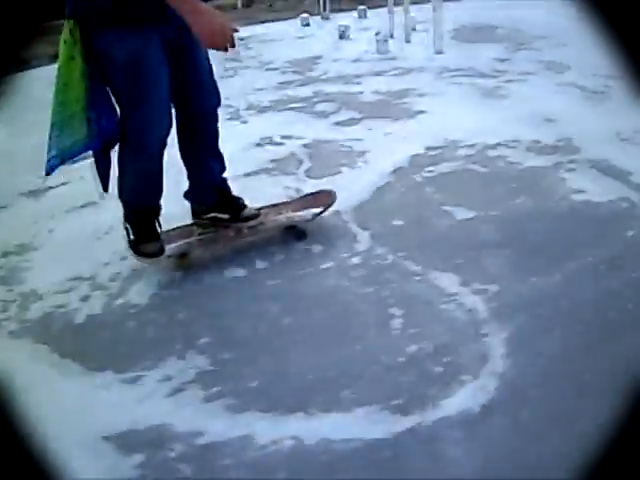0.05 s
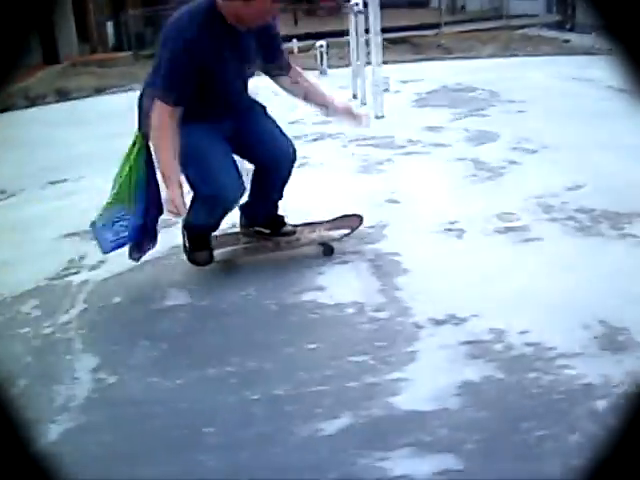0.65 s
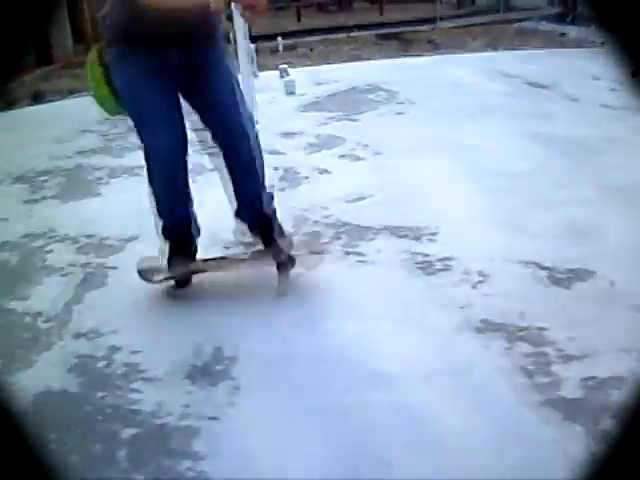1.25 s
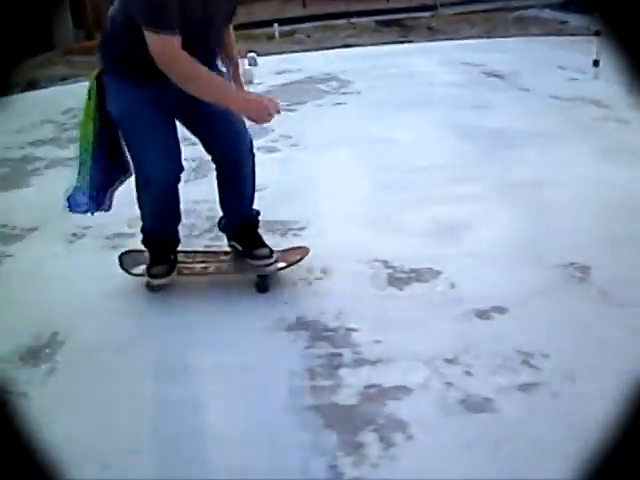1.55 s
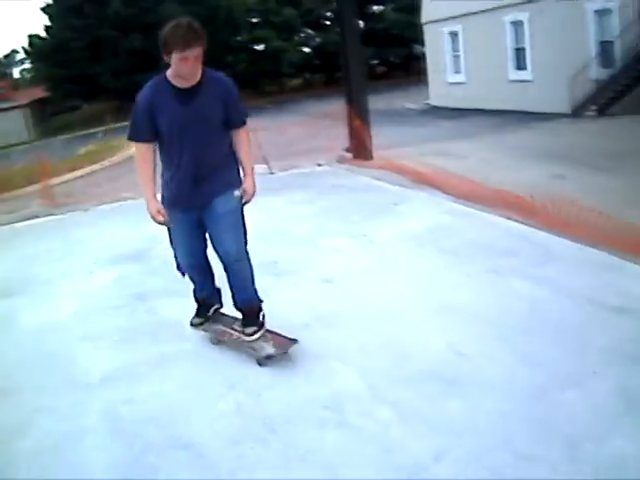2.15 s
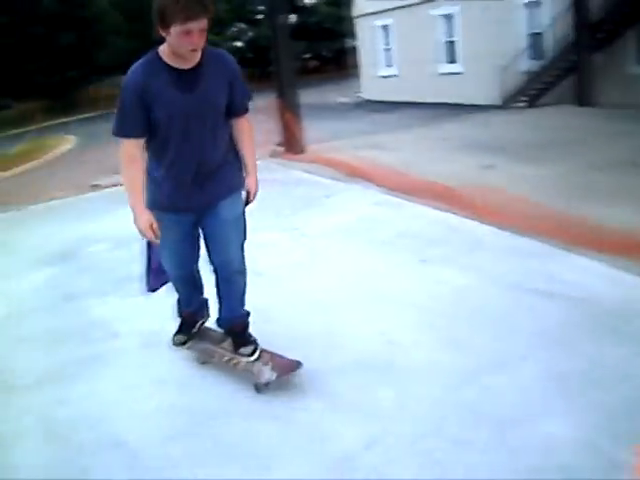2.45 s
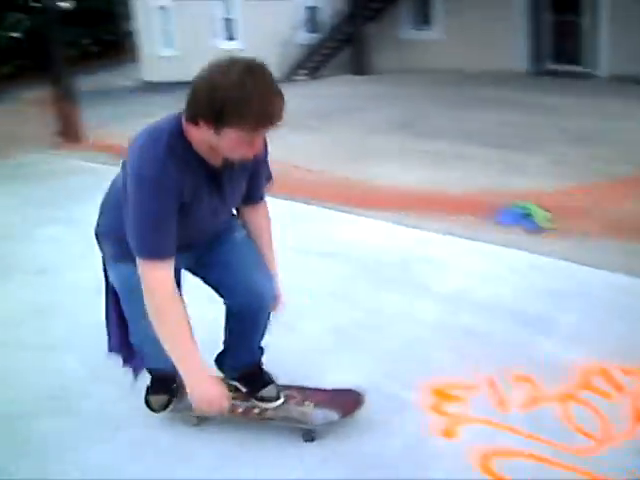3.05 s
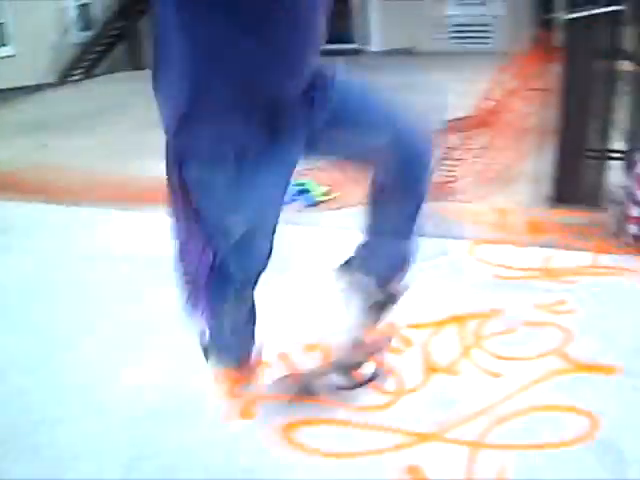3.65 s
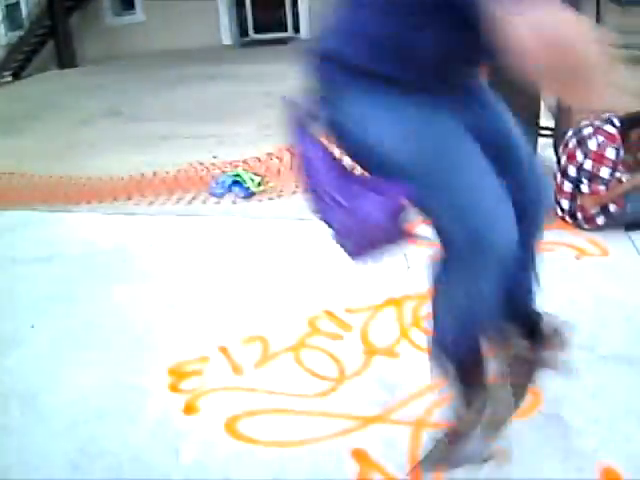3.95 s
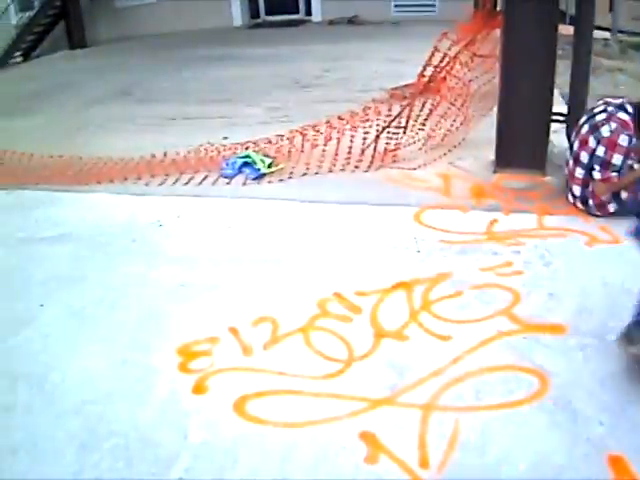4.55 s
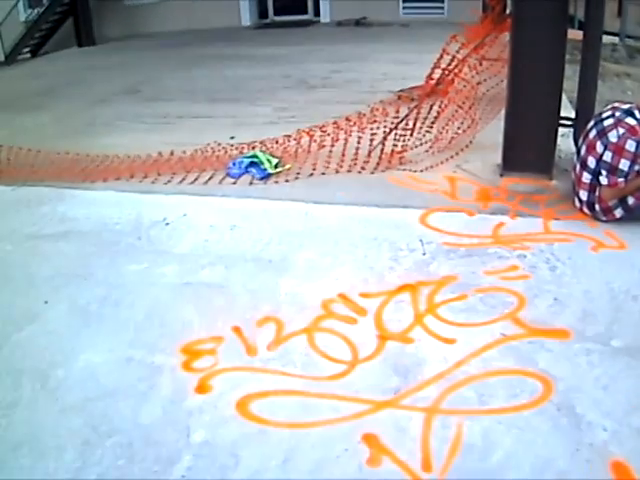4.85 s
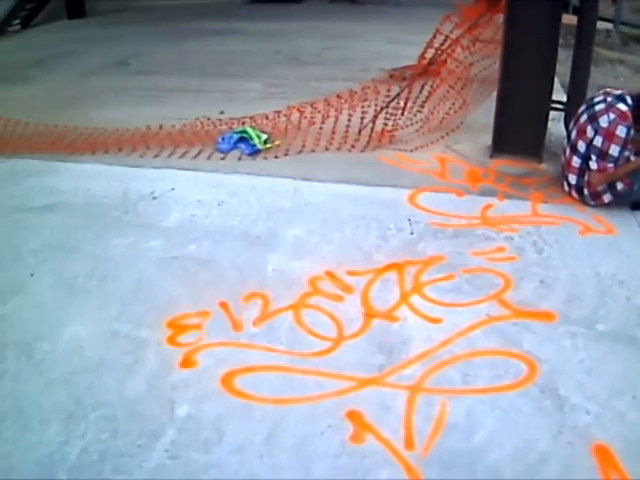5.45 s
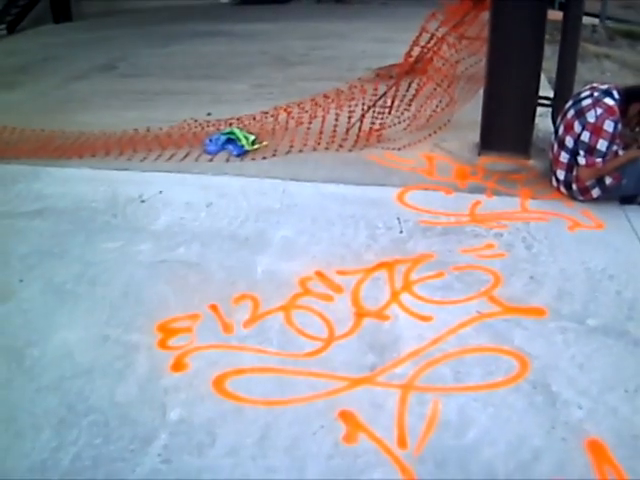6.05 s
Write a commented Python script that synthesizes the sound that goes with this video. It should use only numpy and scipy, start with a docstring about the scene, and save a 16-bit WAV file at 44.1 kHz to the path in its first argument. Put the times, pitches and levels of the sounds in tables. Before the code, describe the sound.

Hard skateboard wheels grind along rough concrete through two runs, each with a sharp tail snap, scraping soles and a clattering wooden landing with a tiny squeak. The second run passes close by, knocks once more and fades into the distance. Plastic clicks, a creak and finger rubs sound right beside the muffled, slightly distorting camera microphone, with steady open-air rumble and hiss underneath.

```python
"""A skateboard rolls over gritty concrete, heard from a hand-held camera that clicks and rubs in the hand.
At 0.9 s the tail pops for a flip trick, shoes scuff the grip tape, and at 1.2 s the deck slams down.
This run breaks off at 2 s. In a second run the skater comes closer, pops at 3.6 s, flips with whirring
wheels, lands close by at 4 s with a chirp of urethane and rolls away until the sound stops at 6.2 s.
Every hard blow overloads the camera's dull microphone."""
import sys
import numpy as np
from scipy import signal
from scipy.fft import rfft, irfft, next_fast_len
from scipy.io import wavfile
from scipy.ndimage import uniform_filter1d, map_coordinates

SR = 44100
rng = np.random.default_rng(int(sys.argv[2]) if len(sys.argv) > 2 else 0)


def int16_out(signal):
    """Quantize to a 16-bit WAV file."""
    q = np.round(np.clip(np.atleast_2d(signal).T, -1, 1) * 32767)
    wavfile.write(sys.argv[1], SR, q.astype(np.int16))


N = 278168
TIME = np.arange(N) / SR
SECOND_RUN_S, END_S = 1.981, 6.213
TAKEOFF_S, TOUCHDOWN_S = 3.58, 3.974  # the second flip

# open-air bed: (frequency [Hz], level [dB])
AIR_EQ = [(30, -26), (70, -4.5), (140, -3.5), (300, -3.5), (1000, -2.5), (5000, -20.5)]
# the microphone's dull top end: (frequency [Hz], gain [dB])
MIC_EQ = [(3000, 0), (4000, -4), (5200, -8), (6000, -20), (7000, -38), (7600, -55), (10500, -49),
          (11500, -60)]
# clicks of the camera's casing: (time [s], level [dB], ring [Hz], relative low push [dB])
CASING_CLICKS = [(0.5846, 0.5, 1880, -34), (1.3496, 1, 2170, -40), (1.714, -3.5, 3900, -35),
                 (2.2747, -0.5, 2424, -22), (2.863, -14.5, 2600, -10), (3.1471, -4.5, 2320, -23),
                 (3.4166, 0.5, 2240, -17.5), (4.1981, 5.5, 2535, -8), (4.366, 5.5, 2450, 0),
                 (4.451, 7, 2340, 4), (4.679, -6.5, 2620, -25), (4.6867, 5, 2440, 10),
                 (4.6946, 5, 2430, -1), (4.709, 9.5, 2420, 6), (5.331, -10.5, 2540, -13),
                 (5.6257, -17.5, 1080, -15), (5.6282, -12.5, 3200, -24), (5.65, -12.5, 3490, -13),
                 (5.679, -28.5, 1980, -15), (6.11, -11, 2530, -18)]
# skin on the casing: (frequency [Hz], level [dB])
FINGER_EQ = [(40, -35), (300, -16.5), (800, -4.5), (1200, -10), (2000, -8), (3000, -0.5), (4000, -12),
             (5000, -7), (7000, -42)]
# finger strokes on the camera: (peak time [s], level [dB], ring [Hz], swell time [s])
FINGER_STROKES = [(5.797, -27, 3160, 0.0062), (5.845, -26, 3230, 0.025), (6.13, -31.5, 2670, 0.054),
                  (6.192, -23, 2725, 0.031)]
# soles on grip tape: (frequency [Hz], level [dB])
GRIP_EQ = [(60, -36), (300, -17.5), (1200, -8.5), (2500, 2.5), (3100, 0.5), (3700, -2), (4600, -7),
           (7000, -19)]
# shoes flicking, catching and settling, and at 1.7 s a long ringing ping of the camera's casing: (peak time
# [s], level [dB], ring [Hz], swell time [s])
SHOE_STROKES = [(0.882, -22.5, 3240, 0.011), (1.385, -23, 2870, 0.034), (1.716, -21, 3920, 0.006),
                (3.569, -20.5, 2520, 0.014), (3.592, -25, 2600, 0.028), (3.682, -25.5, 1876, 0.028),
                (3.76, -33.5, 2700, 0.07), (3.772, -24.5, 2320, 0.0082), (3.836, -21.5, 2620, 0.024),
                (3.88, -30, 3760, 0.01), (3.925, -23.5, 2600, 0.019), (4.055, -20, 2670, 0.03)]
# passing tones of wheels and trucks: (peak time [s], level [dB], pitch [Hz], swell and fade time [s])
TRUCK_TONES = [(2.613, -35, 2850, 0.055), (2.821, -29, 810, 0.039), (3.032, -28, 1240, 0.06),
               (3.268, -37.5, 690, 0.046), (3.33, -31.5, 1800, 0.11), (3.703, -21, 1090, 0.02),
               (4.01, -14, 400, 0.02), (4.14, -24.5, 430, 0.035), (4.16, -24, 1124, 0.017),
               (4.641, -21, 350, 0.013), (4.642, -20.5, 684, 0.01)]
# tones of the board in the air, bearings whirring and the deck ringing at 626 Hz: (pitch [Hz], wander scale
# [Hz], level [dB])
AIRBORNE_TONES = [(626, 15, 0), (968, 58, 1.5), (1140, 67, 4.5), (1296, 48, -6.5), (1840, 35, -11),
                  (2600, 60, -6), (3170, 100, -10.5)]
# the roll when followed, coming closer and going away: (frequency [Hz], level [dB])
FOLLOW_EQ = [(40, -28.5), (120, -24), (200, -13.5), (380, -14.5), (510, -9), (600, 0), (760, 0), (880, -7),
             (1350, -7.5), (1650, -12.5), (2500, -16.5), (3200, -13.5), (3900, -27), (4900, -26),
             (7000, -31)]
TOWARD_EQ = [(40, -36), (140, -24), (420, -14), (700, -1), (850, -2), (950, -4), (1250, 1.5), (1600, -9),
             (2000, -10), (2900, -11), (4000, -20.5), (5100, -24.5), (7000, -20.5)]
AWAY_EQ = [(40, -24.5), (200, -24), (300, -5), (480, -8), (620, 2.5), (850, 4.5), (1100, -5), (1500, 1),
           (2100, -1.5), (2550, 3), (3100, 2.5), (3900, -17.5), (4400, -14.5), (5100, -9), (7000, -24.5)]
# the departing roll sinks unevenly as the board slows: (time [s], gain [dB])
SLOWING_FADER = [(4.75, 1), (5.2, 2.5), (5.43, 2.5), (5.57, -5.5), (5.7, -1.5), (5.77, -3.5), (5.82, -1),
                 (5.95, -2.5), (6.05, -9.5)]
# urethane skids: (peak time [s], level [dB], pitch at the peak [Hz], fade time [s], sag [octaves/s])
SKID_CHIRPS = [(1.41, -7, 980, 0.004, 11), (4.077, -7, 1228, 0.0043, 6), (4.62, -5.5, 926, 0.009, 4)]
# modes of the tail: (pitch [Hz], level [dB], t60 [s])
TAIL_MODES = [(356, -17, 0.16), (473, -1.5, 0.045), (611, -2.5, 0.13), (1261, 0, 0.04), (1930, -3.5, 0.018),
              (2450, -10.5, 0.055)]
# modes of the maple deck and its trucks: (pitch [Hz], width [Hz], level [dB])
DECK_MODES = [(70, 33, -21.5), (196, 50, -18.5), (259, 53, -10.5), (352, 49, -11.5), (453.3, 66, -5),
              (541.3, 41, -1), (597.8, 41, 0.5), (712.5, 67, -0.5), (860, 160, -4), (1040, 160, -7),
              (1187, 59, -4), (1365, 180, -7.5), (1785, 82, -10.5), (2460, 170, -17.5)]
# the bright crack on top of a blow: (frequency [Hz], level [dB])
CRACK_EQ = [(100, -29), (700, -4), (1400, 1.5), (2600, -1), (3600, -3), (5000, -28), (7000, -11.5)]
# the tail slap that starts each flip: (time [s], level [dB], relative crack [dB], chatter hold [s],
# t60 [s], low push [dB], tail ring [dB], tail sustain [factor])
TAIL_POPS = [(0.8668, -6.5, 2.5, 0.0045, 0.025, -17, -9, 0.7), (3.578, -4, 1, 0.0023, 0.05, -32, -7, 1.42)]
# catches, bounces and bumps:
# (time [s], level [dB], relative crack [dB], relative ring [dB], hardness [dB/octave], t60 [s])
DECK_KNOCKS = [(0.8829, -12.5, -4, -16, 5, 0.044), (0.9105, -15, -15, -15, -1.5, 0.023),
               (0.9585, -10, -11, -14.5, -0.5, 0.018), (3.208, -28.5, -24, -16, -8, 0.04),
               (3.9298, -1, 2.5, -16.5, -6.5, 0.027), (3.943, -16.5, -12.5, -11.5, -4, 0.13),
               (4.027, -7, -15, -13, -2, 0.025), (4.0603, -8.5, 0.5, -18.5, 3.5, 0.04),
               (4.0745, -7, -12.5, -18, 0, 0.083), (4.102, -11.5, -10.5, -15, 4.5, 0.068),
               (4.142, -16.5, -13.5, -14.5, -2, 0.04), (4.172, -17.5, -4, -15, 6, 0.06),
               (4.719, -2.5, -5.5, -13, 0.5, 0.043), (4.892, -12.5, -3, -21.5, -4.5, 0.019),
               (5.178, -28, -20, -15, -4, 0.04)]
# landings under the rider's weight: (time [s], level [dB], chatter hold [s], t60 [s], hardness [dB/octave])
DECK_SLAMS = [(1.209, 4, 0.005, 0.018, 0.5), (1.231, 2.5, 0.0068, 0.036, -2), (1.254, 0, 0.028, 0.044, -2),
              (3.9742, 2.5, 0.012, 0.072, -1), (3.988, 1, 0.014, 0.1, 0.5)]
# the trucks rebound and chatter after a landing: (peak time [s], level [dB])
TRUCK_REBOUNDS = [(1.394, -15.5), (4.07, -15)]


def amp(db):
    """Decibels to gain."""
    return 10 ** (np.asarray(db) / 20)


def unit(x):
    """Scale to rms 1."""
    return x / np.sqrt(np.mean(x ** 2) + 1e-20)


def eq(points):
    """EQ curve: gain against frequency, through (frequency [Hz], level [dB]) points on a log axis."""
    f, db = np.transpose(points)
    return lambda hz: amp(np.interp(np.log(hz + 1), np.log(f + 1), db))


def filtered(x, response):
    """Run x through an EQ curve."""
    size = next_fast_len(N + 8192)
    return irfft(rfft(x, size) * response(np.fft.rfftfreq(size, 1 / SR)), size)[:N]


def wobble(rate):
    """Smooth random modulation, rate knots a second."""
    coarse = TIME[::16]
    knots = rng.standard_normal(int(N * rate / SR) + 4)
    return np.interp(TIME, coarse, map_coordinates(knots, [coarse * rate]))


def ramp(start, length):
    """Linear fade from 0 to 1 over length seconds."""
    return np.clip((TIME - start) / length, 0, 1)


def swell(s, rise, fall):
    """Envelope that swells to its peak at time s and dies away."""
    gain = np.zeros(N)
    near = (TIME > s - 10 * rise) & (TIME < s + 20 * fall)
    t = TIME[near] - s
    gain[near] = np.exp(-np.where(t < 0, (t / rise) ** 2, t / fall))
    return gain


def add(track, s, sound):
    """Mix a sound into the track at time s."""
    part = track[round(s * SR):]
    part[:len(sound)] += sound[:len(part)]


def grains(rate):
    """Scattered ticks, on average rate a second."""
    return rng.standard_normal(N) * (rng.random(N) < rate / SR)


def patchy(x, depth_db):
    """Passing resonances: patches a few hundred Hz wide swell and fade."""
    spectra = signal.stft(x, nperseg=512)[2]
    patches = uniform_filter1d(rng.standard_normal(spectra.shape), size=4, axis=0)
    patches = uniform_filter1d(patches, size=16, axis=1)
    return signal.istft(spectra * amp(depth_db * unit(patches)), nperseg=512)[1][:N]


def friction(spectrum, grit_rate, grit_db, flutter_db, patchy_db):
    """Rough surfaces in contact: a fine rush and single grains shake one body; rms 1."""
    grit = amp(grit_db) * unit(grains(grit_rate))
    force = (rng.standard_normal(N) + grit) * amp(flutter_db * wobble(55))
    return unit(filtered(patchy(force, patchy_db), eq(spectrum)))


def rasp(strokes, rush, slip_rate, ring_db, width_hz):
    """Rubbing strokes: a gritty rush, and tiny slips that ring one resonance per stroke."""
    out = np.zeros(N)
    slips = grains(slip_rate)
    for s, db, hz, rise in strokes:
        ring = unit(signal.lfilter(*signal.iirpeak(hz, hz / width_hz, fs=SR), slips))
        out += amp(db) * swell(s, rise, fall=1.6 * rise) * (rush + amp(ring_db) * ring)
    return out


def open_air():
    """A steady bed of low rumble and hiss."""
    return amp(-43) * unit(filtered(rng.standard_normal(N), eq(AIR_EQ)))


def wall_reverb(x, t60):
    """Diffuse answer of the surrounding walls."""
    t = np.arange(SR // 2) / SR
    tail = rng.standard_normal(len(t)) * amp(-60 * t / t60) * (1 - np.exp(-t / 0.0049))
    return signal.fftconvolve(x, tail / np.linalg.norm(tail))[:N]


def casing_creak(start_s=4.6153, count=9, gap_s=0.0034, db=-0.5, hz=2060, rise_hz_per_s=16000):
    """The casing creaks in a quick rising run of slips, given as rows like CASING_CLICKS."""
    delays = gap_s * (np.arange(count) + rng.uniform(0, 0.24, count))
    return [(start_s + delay, db, hz + rise_hz_per_s * delay, -23) for delay in delays]


def casing_clicks(t60_cycles=34.4, body_t60=0.02, snap_t60=0.012):
    """Plastic snaps beside the microphone; hard snaps also knock the housing and push the membrane."""
    out = np.zeros(N)
    t = np.arange(SR // 20) / SR
    treble = signal.butter(4, 4700, "high", fs=SR, output="sos")
    housing = signal.butter(2, [450, 1500], "band", fs=SR, output="sos")
    noise = lambda band: signal.sosfilt(band, rng.standard_normal(len(t)))
    for s, db, hz, push_db in CASING_CLICKS + casing_creak():
        ring_band = signal.butter(3, [0.74 * hz, 1.16 * hz], "band", fs=SR, output="sos")
        ring = np.sin(2 * np.pi * hz * t) + amp(-6.5) * np.sin(2 * np.pi * 0.774 * hz * t)
        rattle = amp(-4) * unit(noise(ring_band))
        envelope = amp(-60 * t * hz / t60_cycles) * (1 - np.exp(-t / 0.00049))
        push = amp(push_db + 2) * np.exp(-((t - 0.0012) / 0.00014) ** 2)
        body = amp(-12 + min(push_db, 0) - 60 * t / body_t60) * unit(noise(housing))
        snap = amp(-5 - 60 * t / snap_t60) * noise(treble)
        add(out, s, amp(db) * ((ring + rattle) * envelope + body + snap - push))
    return out


def finger_rubs():
    """Fingers drag and slip on the camera's casing."""
    skin = friction(FINGER_EQ, grit_rate=1500, grit_db=0, flutter_db=2.5, patchy_db=2.5)
    return rasp(FINGER_STROKES, skin, slip_rate=950, ring_db=-2, width_hz=160)


def shoe_scuffs():
    """Soles scrape over the coarse grip tape; the same gritty rasp also carries the casing's long ping at 1.7
    s."""
    grip = friction(GRIP_EQ, grit_rate=380, grit_db=-2, flutter_db=2.5, patchy_db=2)
    return rasp(SHOE_STROKES, grip, slip_rate=700, ring_db=-4, width_hz=130)


def singing_trucks(width_hz=170):
    """Resonances of wheels and trucks come and go as the load shifts, each a narrow rough band."""
    out = np.zeros(N)
    flutter = unit(wobble(2 * width_hz)) + 1j * unit(wobble(2 * width_hz))
    drift = np.angle(flutter)
    for s, db, hz, length in TRUCK_TONES:
        near = np.abs(TIME - s) < 10 * length
        tone = np.sin(2 * np.pi * hz * TIME[near] + drift[near])
        out[near] += amp(db) * swell(s, length, length)[near] * tone
    return out * np.abs(flutter)


def airborne(attack_s=0.061, release_s=0.067):
    """Soft gate, open while the board is in the air on the second flip."""
    return ramp(TAKEOFF_S, attack_s) * (1 - ramp(TOUCHDOWN_S - release_s, release_s))


def airborne_board():
    """During the second flip the unloaded bearings whirr and the deck rings at 626 Hz, in narrow, wandering
    bands."""
    whirr = np.zeros(N)
    for hz, wander_hz, db in AIRBORNE_TONES:
        pitch = hz + wander_hz * (0.77 * wobble(25) + 1.5 * wobble(400))
        gain = amp(db + 4.4 * wobble(22.286) + 3.8 * wobble(200))
        whirr += gain * np.sin(2 * np.pi * np.cumsum(pitch) / SR)
    return amp(-25.5) * airborne() * unit(whirr)


def first_roll(fade_db_per_s=0.96):
    """Hard wheels on gritty concrete, followed by the camera as the board slowly loses speed."""
    roll = friction(FOLLOW_EQ, grit_rate=900, grit_db=-6.5, flutter_db=0.8, patchy_db=1.5)
    return amp(-19 - fade_db_per_s * TIME) * roll


def second_roll(pass_s=3.846, nearest_m=1.02, speed_m_per_s=1.696):
    """Wheels on concrete in a pass-by: louder as they near, thinner once heard from behind."""
    toward = friction(TOWARD_EQ, grit_rate=1200, grit_db=-8.5, flutter_db=0.93, patchy_db=1)
    away = friction(AWAY_EQ, grit_rate=690, grit_db=-5.5, flutter_db=0.6, patchy_db=2.3)
    distance = np.hypot(nearest_m, speed_m_per_s * (TIME - pass_s))
    # the roll ducks during the flip, then surges as the rider's weight presses the wheels down
    pressed = (TIME > TOUCHDOWN_S) * np.exp(-np.abs(TIME - TOUCHDOWN_S) / 0.11)
    gain = amp(-22 + 8.5 * pressed - 3 * airborne()) * nearest_m / distance
    behind = 0.93 * ramp(start=4.12, length=0.73)
    slowing = amp(np.interp(TIME, *np.transpose(SLOWING_FADER)))
    crossfade = np.sqrt(1 - behind) * toward + np.sqrt(behind) * slowing * away
    distant = amp(-32.5 - 14 * (TIME - SECOND_RUN_S)) * away  # the run opens on a thin, fading roll
    return gain * crossfade + distant


def wheel_chirps():
    """A wheel skids sideways and squeals briefly; its pitch sags as it finds grip."""
    out = np.zeros(N)
    for s, db, hz, fall, sag in SKID_CHIRPS:
        octaves = np.clip(sag * (s - TIME), -1, 1) + 0.046 * wobble(350)
        squeal = np.sin(2 * np.pi * np.cumsum(hz * 2 ** octaves) / SR)
        out += amp(db) * swell(s, rise=0.0036, fall=fall) * squeal
    return out


def tail_ring():
    """The tail rings after it hits the concrete, longer when the foot comes off early."""
    out = np.zeros(N)
    t = np.arange(SR // 3) / SR
    for s, *_, ring_db, sustain in TAIL_POPS:
        for hz, mode_db, t60 in TAIL_MODES:
            add(out, s, amp(ring_db + mode_db - 60 * t / (t60 * sustain)) * np.sin(2 * np.pi * hz * t))
    return out


def chatter(size, hardness_db):
    """Deck and trucks shaken at random, rms 1; hard contact favours the high modes, soft the low."""
    f = np.fft.rfftfreq(size, 1 / SR)
    response = 0
    for k, (hz, width, db) in enumerate(DECK_MODES):
        tilt_db = hardness_db * np.clip(np.log2(hz / 700), -1, 2)
        resonance = 1j * f * width / (hz * hz - f * f + 1j * f * width)
        response += (-1) ** k * amp(db + tilt_db) * resonance
    return unit(irfft(rfft(rng.standard_normal(size)) * response, size))


def blows(slam_crack_db=-3.5, slam_ring_db=-21.5, pop_ring_db=-16.5, pop_hardness_db=-3):
    """One cue list of knocks, slams and pops for the deck to play."""
    push = lambda db, crack_db: -16.5 + 2 * (db + crack_db)
    for s, db, crack_db, ring_db, hardness_db, t60 in DECK_KNOCKS:
        yield s, db, crack_db, 0, t60, ring_db, hardness_db, push(db, crack_db)
    for s, db, hold, t60, hardness_db in DECK_SLAMS:
        yield s, db, slam_crack_db, hold, t60, slam_ring_db, hardness_db, push(db, slam_crack_db)
    for s, db, crack_db, hold, t60, push_db, *_ in TAIL_POPS:
        yield s, db, crack_db, hold, t60, pop_ring_db, pop_hardness_db, push_db


def deck_hits(push_peak_s=0.00048):
    """Each blow sets deck and trucks chattering, with a short crack on top; the wood rings on."""
    rebound = sum(amp(db) * swell(s, rise=0.02, fall=0.047) for s, db in TRUCK_REBOUNDS)
    wood = rebound * chatter(next_fast_len(N), hardness_db=2.5)[:N]
    crack_power = (amp(-3) * rebound) ** 2
    t = np.arange(SR // 3) / SR
    push = t / push_peak_s * np.exp(1 - t / push_peak_s)  # a sharp slap also shoves the air
    for s, db, crack_db, hold, t60, ring_db, hardness_db, push_db in blows():
        decay_db = 60 * np.maximum(t - hold, 0) / t60
        add(wood, s, amp(db - decay_db) * chatter(len(t), hardness_db))
        add(crack_power, s, amp(db + crack_db - decay_db / 0.69) ** 2)
        add(wood, s, amp(push_db) * push)
        for hz, width, mode_db in DECK_MODES:
            ring = np.exp(-1.3 * width * t) * np.sin(2 * np.pi * (hz * t + rng.random()))
            add(wood, s, amp(db + ring_db + 2 * mode_db) * ring)
    crack = unit(filtered(rng.standard_normal(N), eq(CRACK_EQ)))
    return wood + np.sqrt(crack_power) * crack


def scene():
    """Mono mix: hits with a touch of reverb, the roll, scuffs, handling noise and open air."""
    hits = deck_hits() + tail_ring() + wheel_chirps()
    roll = np.where(TIME < SECOND_RUN_S, first_roll(), second_roll())
    wheels = roll + airborne_board() + singing_trucks()
    reverb = amp(-33) * wall_reverb(hits, t60=0.065)
    return (hits + reverb + wheels + shoe_scuffs() + finger_rubs() + casing_clicks() + open_air())[None]


def record(dry):
    """Lopsided saturation adds a thud to hard blows; the treble is cut, and the camera stops."""
    ceiling = np.where(dry[0] > 0, 0.74, 0.8)
    saturated = dry[0] / (1 + np.abs(dry[0] / ceiling) ** 4) ** (1 / 4)
    running = TIME < END_S
    return filtered(saturated * running, lambda hz: eq(MIC_EQ)(hz) * (hz < 11500))[None]


dry = scene()
out = record(dry)
int16_out(out)
```